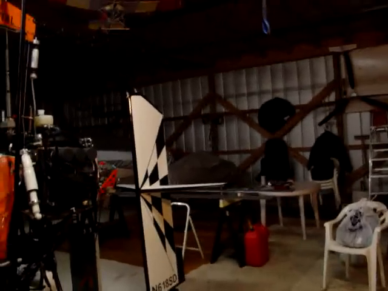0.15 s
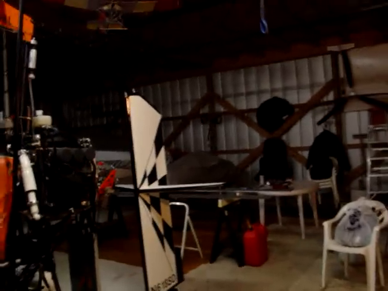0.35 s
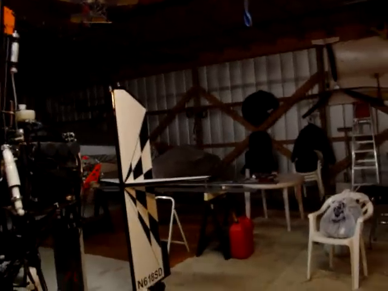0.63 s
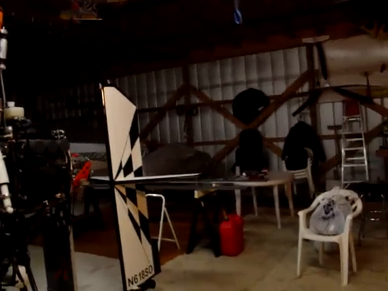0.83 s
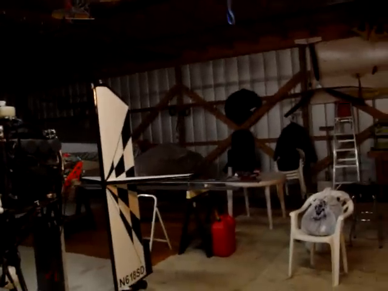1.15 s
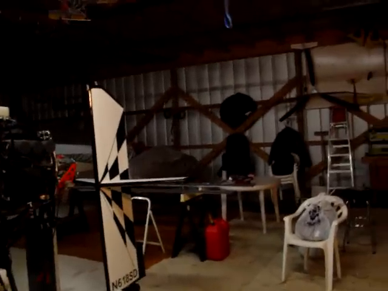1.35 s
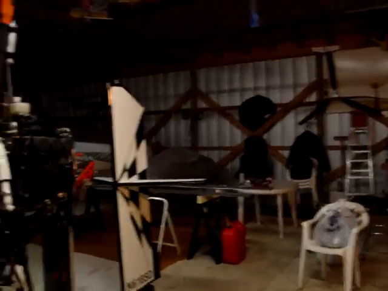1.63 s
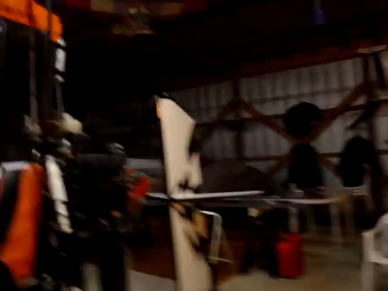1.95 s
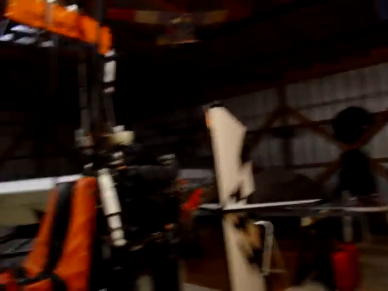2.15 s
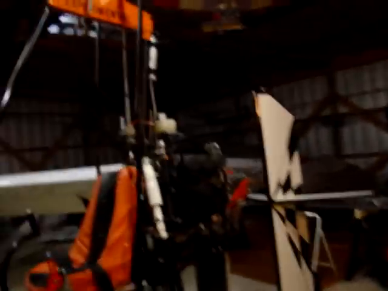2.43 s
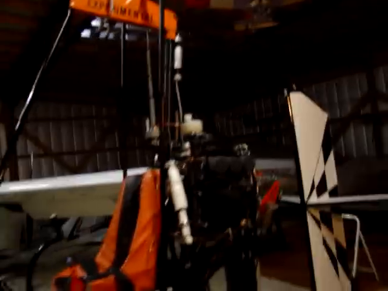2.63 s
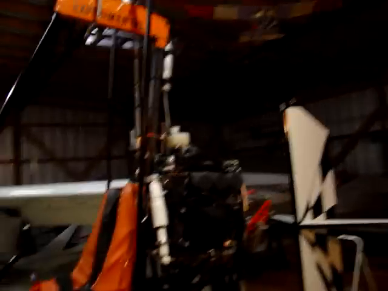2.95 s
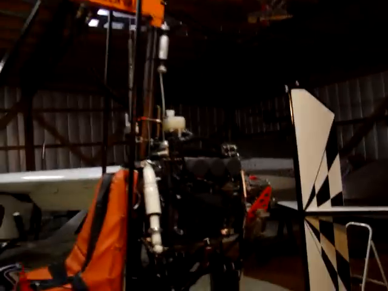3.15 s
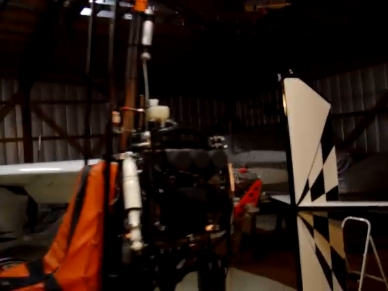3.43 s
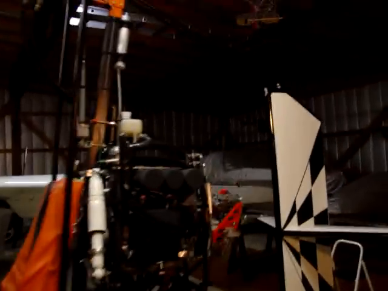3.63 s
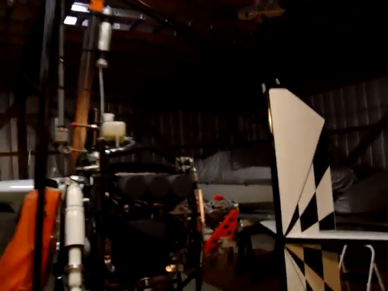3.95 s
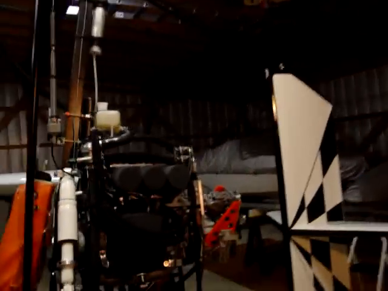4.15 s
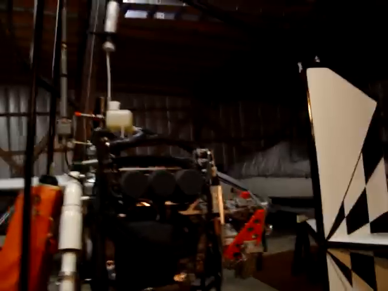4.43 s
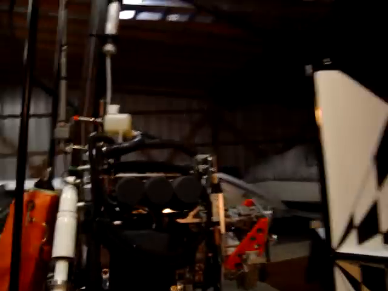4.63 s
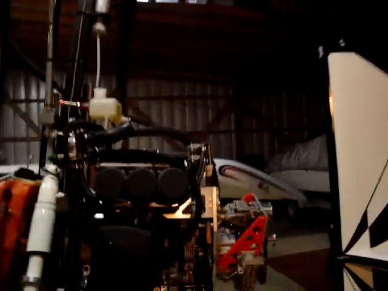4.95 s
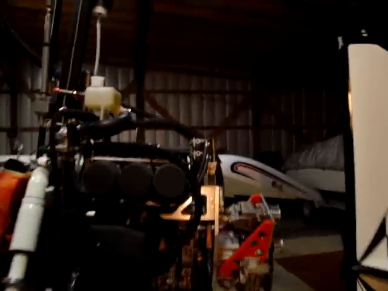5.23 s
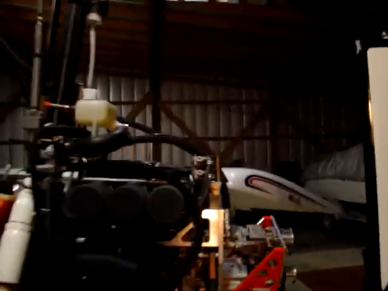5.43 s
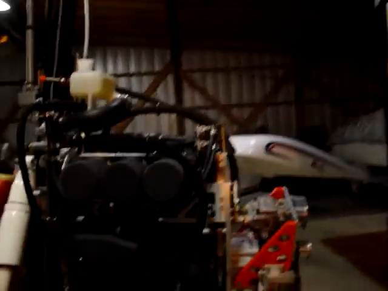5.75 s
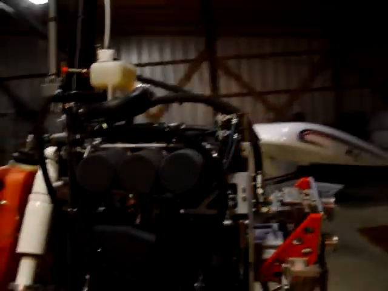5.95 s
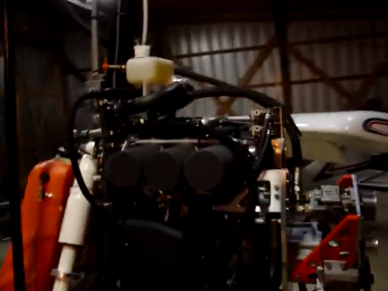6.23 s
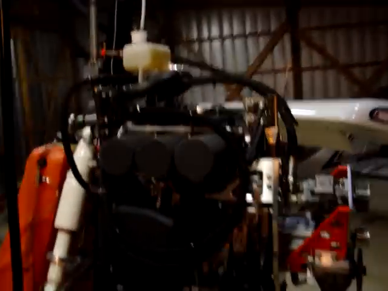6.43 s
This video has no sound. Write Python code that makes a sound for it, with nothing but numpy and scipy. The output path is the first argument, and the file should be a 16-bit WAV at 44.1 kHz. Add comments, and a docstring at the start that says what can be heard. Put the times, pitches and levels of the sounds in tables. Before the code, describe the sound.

A small petrol engine idles unevenly with a rough, throaty exhaust in a metal hangar, its clatter growing clearer as the microphone approaches.

```python
"""A small three-cylinder petrol engine is heard idling unevenly, growing closer in a sheet-metal hangar.
Unequal firings, timed by an uneven crank speed, excite a decaying silencer ring and filtered gas noise.
Noise bursts through metal resonances give the clatter; coloured noise gives hiss, whirr and faint rumble.
A diffuse noise tail and moving resonances draw the booms into a drone that shifts as the microphone walks up."""
import sys
import numpy as np
from scipy import signal
from scipy.fft import rfft, irfft
from scipy.io import wavfile
from scipy.ndimage import uniform_filter1d, minimum_filter1d

SR = 44100
rng = np.random.default_rng(int(sys.argv[2]) if len(sys.argv) > 2 else 0)


def materialize(psi):
    """Save the field psi as 16-bit PCM at rate SR to the path in sys.argv[1].

    A 1-D psi becomes a single channel; in a 2-D psi each row is a channel.
    """
    bounded = np.clip(np.atleast_2d(psi).T, -1, 1)
    quanta = np.round(bounded * 32767).astype(np.int16)
    wavfile.write(sys.argv[1], SR, quanta)


N = 290486
TIME = np.arange(N) / SR  # s

# The walk up to the engine: (time [s], nearness [0-1])
WALK = [(0, 0), (2.0, .12), (3.6, .5), (6.0, 1)]

# Filter spectra, relative to the sound being coloured: (frequency [Hz], gain [dB])
THUD_SPECTRUM = [(10, -54.5), (28, -33), (45, -25), (60, 0.5), (74, -11.5), (90, -1), (102, 2.5),
                 (118, 1.5), (160, 8.5), (300, -38), (700, -46.5)]
RASP_SPECTRUM = [(120, -34.5), (230, 4), (330, 2.5), (420, 1.5), (470, -0.5), (560, -4), (640, -9),
                 (740, -8), (860, -15.5), (950, -11), (1200, -17.5), (2000, -23), (5000, -70.5)]
CLATTER_SPECTRUM = [(400, -27.5), (900, -4), (1150, -4.5), (1500, 1), (1800, -3.5), (2200, -2.5),
                    (2550, -3), (3050, -3), (3350, 2), (3750, -5), (4200, -5), (4580, -13), (5400, -4.5),
                    (7000, -14), (10000, -33)]
HISS_SPECTRUM = [(2000, -11), (4000, -10), (5500, -7), (6200, -7), (6700, -4.5), (7600, -1), (8500, 0),
                 (9000, -6.5), (9500, -11), (10000, -14)]
RUMBLE_SPECTRUM = [(5, 3.5), (25, -19.0), (60, -13.0), (150, -7.5), (600, -58.5)]
WHIRR_SPECTRUM = [(1500, -18), (3500, 2.5), (4600, -4), (5400, -3.5), (6500, -1), (8000, -11), (10000, -8.5)]

# Reverberation of the hangar: (frequency [Hz], time to decay by 60 dB [s])
HALL_DECAY = [(80, 0.56), (250, 1), (1000, 0.93), (4000, 0.62), (10000, 0.14)]
# Standing waves, each swelling as the microphone passes through it:
# (time [s], half length [s], frequency [Hz], width [Hz], level beside the boom before random swells [dB])
STANDING_WAVES = [(0.96, 1.25, 218, 16, -8), (0.73, 2.54, 510, 6.7, -16.5), (1.04, 1.1, 350, 19, -14.5),
                  (0.62, 0.65, 230, 15, -11), (2.2, 0.75, 175, 17, -11.5), (3.01, 0.6, 392, 31, -14),
                  (2.94, 0.78, 947, 42, -27.5), (3.7, 4.3, 308, 18, -15.5), (3, 1.8, 127, 8.4, -18.5),
                  (3.4, 6.2, 90, 6.1, -23.5), (4.58, 0.15, 177, 6.7, -6), (5.38, 0.2, 177, 6.6, -4.5),
                  (6.22, 0.18, 177, 7.3, -3), (5.3, 1.4, 163, 12, -11), (5.53, 0.83, 262, 24, -7.5),
                  (5.83, 0.78, 520, 23, -17.5)]
# Strongest standing wave, whose pitch sinks along the walk: (time [s], frequency [Hz], level beside the boom [dB])
DRONE_PATH = [(1.85, 261, -23), (2.42, 257.4, -3.5), (2.68, 255.6, -8.5), (3.0, 262.7, -2.5),
              (3.35, 261.5, -2.5), (3.7, 256.2, 1), (3.95, 242.5, -7), (4.3, 243.5, -2.5), (4.7, 235.6, -8),
              (5.2, 228, -23)]
DRONE_WIDTH_HZ = 14
# Dead bands, where reflections from floor and walls cancel the exhaust:
# (frequency [Hz], width [Hz], depth far [0-1], depth near [0-1])
NOTCHES = [(199.4, 10, 0.46, 0.42), (283.3, 10, 0.5, 0.88), (385, 52, 0.03, 0.37), (479, 22, 0.7, 0.49)]

# Uneven crank speed, at which each cylinder fires once a turn: (time [s], speed [turns/s])
CRANK_SPEED = [(0.0, 29.49), (0.13, 26.85), (0.17, 30.91), (0.3, 26.8), (0.34, 26.82), (0.39, 32.83),
               (0.5, 26.77), (0.54, 29.83), (0.65, 32.9), (0.76, 25.69), (0.88, 31.85), (0.92, 28.04),
               (1.0, 28.86), (1.05, 26.05), (1.15, 31.29), (1.19, 26.6), (1.37, 32.3), (1.46, 26.11),
               (1.55, 32.98), (1.61, 27.5), (1.72, 31.2), (1.86, 26.93), (1.92, 32.21), (1.98, 27.16),
               (2.13, 31.28), (2.32, 30.56), (2.38, 26.52), (2.42, 32.6), (2.52, 28.75), (2.63, 28.51),
               (2.67, 33.77), (2.75, 28.19), (2.85, 29.12), (2.93, 30.25), (2.97, 28.21), (3.05, 31.1),
               (3.16, 26.17), (3.2, 31.07), (3.31, 29.54), (3.35, 31.9), (3.39, 28.98), (3.52, 31.63),
               (3.69, 26.89), (3.73, 32.83), (3.85, 27.33), (3.94, 32.52), (4.07, 26.96), (4.14, 31.99),
               (4.25, 28.89), (4.34, 28.75), (4.38, 34.66), (4.47, 27.16), (4.6, 31.19), (4.66, 27.78),
               (4.79, 30.99), (4.87, 28.56), (4.97, 31.65), (5.11, 26.33), (5.15, 33.24), (5.23, 29.95),
               (5.41, 28.87), (5.45, 30.62), (5.51, 28.98), (5.6, 27.48), (5.66, 33.79), (5.76, 29.5),
               (5.89, 28.41), (5.93, 31.9), (6.02, 29.88), (6.13, 29.35), (6.22, 30.71), (6.3, 27.68),
               (6.43, 31.79), (6.5, 27.48), (6.54, 30.24), (6.59, 31.93)]
START_TURN = .156  # crank position at time zero, in turns
# Changes in strength of the first cylinder, mostly weak burns: (time [s], level [dB])
STUMBLES = [(1.239, -10), (2.04, -7), (2.558, -11), (3.22, -4.5), (3.386, -22.5), (4.161, -4.5),
            (4.314, -9.5), (4.729, -7.5), (4.948, -10), (5.27, 2), (5.65, -10), (5.769, -8), (6.48, -9)]
STUMBLE_S = 0.019  # Gaussian half length
# Weaker cylinders beside the first: (level far [dB], level halfway [dB], level near [dB])
SECOND_DB = (-10.5, -8.5, -4.5)
THIRD_DB = (-13.5, -17, -12)
# Lag of the second cylinder behind the first: (far [turns], halfway [turns], near [turns])
SECOND_LAG = (.39, .357, .36)
THIRD_LAG = .685  # turns
PIPE_HZ, RING_S = 218, .00152  # the silencer's ring and its decay constant

# Resonances of block and brackets: (frequency [Hz], width [Hz], drive gain far [dB], drive gain near [dB]);
# each gain also wanders at random
METAL_MODES = [(1958, 45, 3.5, 2), (2800, 120, -1, 3), (3574, 45, 2.5, -4), (3860, 50, 7, 6.5),
               (4386, 64, 7, 7.5), (4800, 340, -4, 8)]
# A bracket briefly rattles harder: (time [s], half length [s], frequency [Hz], level [dB])
RATTLES = [(1.39, 0.047, 3615, -35.5), (6.42, 0.052, 2830, -38.5)]
RATTLE_WIDTH_HZ = 60
# Sharp metallic ticks: (time [s], level before a common trim and filter [dB])
TICKS = [(4.498, -23), (4.773, -16), (5.4755, -23), (5.914, -20), (5.9777, -19), (6.178, -14.5)]
# Bands of the hiss that flicker independently: (frequency [Hz], ...)
FLICKER_BANDS = (5600, 7200, 8400)
# Slow wavering of the hiss: (time [s], level [dB])
HISS_DRIFT = [(0.3, 2.4), (1.2, -0.9), (2.3, 1.3), (3.35, -1.6), (4.1, -0.3), (5.1, -0.5)]
# Share of the hiss that travels straight from the engine: (far [0-1], near [0-1])
DIRECT_SHARE = (0.49, 1)

# Loudness contours before each sound's trim: (level far [dB], level halfway [dB], level near [dB])
BOOM_DB = (-15, -13.5, -13.5)
RASP_DB = (-26.5, -28.5, -30.5)
CLATTER_DB = (-34.5, -34.5, -32.5)
HISS_DB = (-37, -35.5, -36.5)
BARK_DB = (-47, -39, -35.5)
WHIRR_DB = (-39, -41.5, -46.5)

EDGE_HZ = 10050  # upper edge of the band


def gain_of(db):
    """Logarithmic level: 20 dB is a factor of ten in amplitude."""
    return 10 ** (np.asarray(db) / 20)


def evened(x):
    """Power normalization: scales to an rms of 1."""
    return x / np.sqrt(np.mean(x ** 2) + 1e-20)


def steadied(x):
    """Short-term power normalization: divides by a moving rms, smoothed over a fraction of a second."""
    power = uniform_filter1d(uniform_filter1d(x ** 2, size=12000), size=6000)
    return x / np.sqrt(power + 1e-20)


def along(values, t=TIME):
    """Distance dependence: interpolates from the far value to the near one along the walk."""
    nearness = np.interp(t, *np.transpose(WALK))
    return np.interp(nearness, np.linspace(0, 1, len(values)), values)


def read(points, hz):
    """Logarithmic pitch scale: interpolates a spectrum table over log frequency."""
    f, value = np.transpose(points)
    return np.interp(np.log(hz + 1), np.log(f + 1), value)


def colour(x, points):
    """Minimum phase: the Hilbert transform of the log gain fixes the phase of a causal filter."""
    hz = abs(np.fft.fftfreq(8192, 1 / SR))
    log_gain = np.log(gain_of(read(points, hz)))
    taps = np.fft.ifft(np.exp(np.conj(signal.hilbert(log_gain)))).real
    return signal.oaconvolve(x, taps[:len(taps) // 2])[:N]


def resonate(x, hz, width):
    """Simple resonance: a two-pole peak of unit gain at its centre."""
    return signal.lfilter(*signal.iirpeak(hz, hz / width, SR), x)


def glide(x, hz, width):
    """Heterodyning: shifts a moving pitch to zero, low-passes it and shifts it back."""
    turn = np.exp(2j * np.pi * np.cumsum(hz) / SR)
    r = np.exp(-np.pi * width / SR)
    return 2 * (turn * signal.lfilter([1 - r], [1, -r], x / turn)).real


def clicks(times, sizes):
    """Impulse excitation: one single-sample pulse at each time."""
    samples = np.round(np.maximum(times, 0) * SR).astype(int)
    return np.bincount(samples, sizes, N)[:N]


def puffs(times, sizes, decay):
    """Turbulent bursts: noise whose power rises quickly and dies away exponentially."""
    u = np.arange(SR // 10) / SR / decay
    power = signal.oaconvolve(clicks(times, sizes ** 2), u * np.exp(-u))[:N]
    return np.sqrt(abs(power)) * rng.standard_normal(N)


def scatter(times, spread_db):
    """Random excitation: a clipped normal spread of levels, one for each event."""
    return gain_of(spread_db * np.clip(rng.standard_normal(len(times)), -2, 2))


def wander(size):
    """Slow fluctuation: random steps of so many samples, smoothed and scaled to an rms of 1."""
    steps = np.repeat(rng.standard_normal(N // size + 1), size)
    return evened(uniform_filter1d(steps, size))[:N]


def rumble(level_db=-52):
    """Ambient noise: low-coloured random pressure stands for the air of the hall."""
    return gain_of(level_db) * evened(colour(rng.standard_normal(N), RUMBLE_SPECTRUM))


def hangar(x, count=5):
    """Diffuse reverberation: sparse noise tails decay by frequency and cross-fade from place to place."""
    shape = (count, SR)
    taps = rng.standard_normal(shape) * (rng.random(shape) < .1) * (TIME[:SR] > .014)
    hz, t, z = signal.stft(taps, SR, nperseg=256)
    decay = gain_of(-60 * t / read(HALL_DECAY, hz)[:, None])
    tails = signal.istft(z * decay, SR, nperseg=256)[1]
    tails /= np.linalg.norm(tails, axis=1, keepdims=True)
    wet = irfft(rfft(x) * rfft(tails, N), N)  # circular: the hall is already ringing at the start
    place = np.linspace(0, count - 1, N) - np.arange(count)[:, None]
    fade = np.cos(np.pi / 2 * np.clip(place, -1, 1))
    return (wet * fade).sum(0)


def drone(x):
    """Standing wave: a narrow resonance of moving pitch draws a hum from the booms."""
    s, hz, db = np.transpose(DRONE_PATH)
    hz = np.interp(TIME, s, hz)
    wave = glide(glide(x, hz, DRONE_WIDTH_HZ), hz, 6 * DRONE_WIDTH_HZ)
    return gain_of(np.interp(TIME, s, db)) * steadied(wave)


def cancelled(x):
    """Destructive interference: subtracting a resonance leaves a dead band."""
    for hz, width, *depth in NOTCHES:
        x = x - np.clip(along(depth), 0, 1) * resonate(x, hz, width)
    return x


def whirr():
    """Broadband flow and friction noise: the smooth hiss of belts and intake air."""
    return gain_of(along(WHIRR_DB)) * evened(colour(rng.standard_normal(N), WHIRR_SPECTRUM))


def ticks(level_db=7):
    """Impact noise: loose metal gives single bright, short bursts with a faint reverberant tail."""
    s, db = np.transpose(TICKS)
    sound = colour(puffs(s, gain_of(db + level_db), decay=0.00047), HISS_SPECTRUM)
    return sound + gain_of(-25) * hangar(sound)


def hiss(times, trail_db=2, grit_db=-3, flicker_db=0.04, patch_db=2, level_db=3.5):
    """Jet noise: a spit and trail once a turn, with loose grit; the direct share grows with nearness."""
    spit = evened(puffs(times + 0.0012, scatter(times, spread_db=0.5), decay=0.0013))
    trail = evened(puffs(times + 0.0052, scatter(times, spread_db=3.5), decay=0.0055))
    grains = rng.uniform(0, TIME[-1], size=900)
    grit = evened(puffs(grains, scatter(grains, spread_db=4), decay=.0005))
    dry = evened(spit + gain_of(trail_db) * trail + gain_of(grit_db) * grit)
    share = np.clip(along(DIRECT_SHARE), 0, 1)
    sound = colour(np.sqrt(share) * dry + np.sqrt(1 - share) * hangar(dry), HISS_SPECTRUM)
    for hz in FLICKER_BANDS:
        patch = gain_of(patch_db * wander(size=600)) - 1
        sound = sound + patch * resonate(sound, hz, 1000)
    flickering = sound * gain_of(flicker_db * wander(size=800))
    drift_db = np.interp(TIME, *np.transpose(HISS_DRIFT))
    return gain_of(along(HISS_DB) + drift_db + level_db) * steadied(flickering)


def clatter(times, strength, whirr_db=-11, wander_db=2.0, hall_db=-3, level_db=-0.98):
    """Modal excitation: two knocks a firing and the drive's whirr ring the block and brackets."""
    knocks = 0
    for lag in (.0015, .0058):  # s
        size = strength ** 0.65 * scatter(times, spread_db=4.0)
        knocks = knocks + puffs(times + lag, size, decay=0.00054)
    drive = evened(knocks) + gain_of(whirr_db) * rng.standard_normal(N)
    drive = gain_of(-3.0) * drive + gain_of(hall_db) * hangar(drive)
    rung = drive
    for hz, width, *db in METAL_MODES:
        rung = rung + gain_of(along(db) + wander_db * wander(size=4000)) * resonate(drive, hz, width)
    rattles = 0
    for s, half, hz, db in RATTLES:
        swell = gain_of(db) * np.exp(-((TIME - s) / half) ** 2)
        rattles = rattles + swell * evened(resonate(drive, hz, RATTLE_WIDTH_HZ))
    return gain_of(along(CLATTER_DB) + level_db) * steadied(colour(rung, CLATTER_SPECTRUM)) + rattles


def firings(spread_db=.6, weak_spread_db=2, jitter_s=0.0001, count=198):
    """Crank kinematics: integrated speed times the firings; one row a cylinder, the weak ones less even."""
    t = np.arange(N + SR) / SR
    turns = START_TURN + np.cumsum(np.interp(t, *np.transpose(CRANK_SPEED))) / SR
    turn = np.arange(count)
    starts = np.interp(turn, turns, t)
    positions = [turn, turn + along(SECOND_LAG, starts), turn + THIRD_LAG]
    times = np.interp(positions, turns, t)
    times = times + jitter_s * rng.standard_normal(times.shape)
    stumble_db = sum(db * np.exp(-((starts - s) / STUMBLE_S) ** 2) for s, db in STUMBLES)
    first = scatter(starts, spread_db) * gain_of(stumble_db)
    weak = [gain_of(along(db, starts)) * scatter(starts, weak_spread_db) for db in (SECOND_DB, THIRD_DB)]
    return times, np.array([first, *weak])


def bark(times, body_hz=720, width_hz=260):
    """Cavity resonance: the third cylinder's gas pulses give a short, hollow bark, louder close to."""
    size = scatter(times, spread_db=2)
    gas = evened(clicks(times + 0.00062, size)) + evened(puffs(times, size, decay=0.0052))
    body = resonate(resonate(gas, body_hz, width_hz), body_hz, 2 * width_hz)
    return gain_of(along(BARK_DB)) * steadied(body)


def rasp(times, strength, rough=0.73, hall_db=1, level_db=3):
    """Wave steepening: the sharp front of each gas pulse and its turbulence feed the middle band."""
    front = clicks(times + 0.0026, strength * scatter(times, spread_db=1.5))
    gas = evened(front) + rough * evened(puffs(times, strength, decay=0.0019))
    sound = colour(gas + gain_of(hall_db) * hangar(gas), RASP_SPECTRUM)
    return gain_of(along(RASP_DB) + level_db) * steadied(sound)


def exhaust(times, strength, hall_db=-15, thud_db=-13.5, turbulence=0.39, swell_db=1.5, level_db=-0.25):
    """Impulse response: firings ring the silencer over a deep thud, and room modes prolong them."""
    pulses = clicks(times, strength)
    wet = hangar(pulses)
    t = TIME[:SR // 20]
    silencer = -t ** 3 * np.exp(-t / RING_S) * np.sin(2 * np.pi * PIPE_HZ * t)
    boom = evened(signal.oaconvolve(pulses + gain_of(hall_db) * wet, silencer)[:N])
    gas = evened(puffs(times, strength, decay=0.0013))  # turbulence makes no two thuds alike
    blast = evened(pulses + wet) + turbulence * gas
    sound = boom + gain_of(thud_db) * evened(colour(blast, THUD_SPECTRUM)) + drone(boom)
    for s, half, hz, width, db in STANDING_WAVES:
        wave = resonate(resonate(boom + blast, hz, width), hz, 4 * width)
        swell = gain_of(db + swell_db * wander(size=6000))
        sound = sound + swell * np.exp(-((TIME - s) / half) ** 2) * steadied(wave)
    high_pass = signal.butter(2, 34, "high", fs=SR, output="sos")
    return gain_of(along(BOOM_DB) + level_db) * steadied(signal.sosfilt(high_pass, sound))


def scene():
    """Superposition: background and engine sounds add, with one set of firings driving the engine."""
    times, strength = firings()
    every = times.ravel(), strength.ravel()
    background = rumble() + ticks() + whirr()
    mechanism = hiss(times[0]) + clatter(*every)
    pipe = cancelled(rasp(*every) + exhaust(*every))
    return (background + mechanism + bark(times[2]) + pipe)[None]


def record(dry):
    """Peak limiting and band limiting: a quick, soft gain reduction precedes a low-pass."""
    peak = -minimum_filter1d(-abs(dry), size=260)
    reduction = uniform_filter1d(np.maximum(peak / .56, 1) ** .65, size=130)
    low_pass = signal.firwin(511, EDGE_HZ, window=("kaiser", 9), fs=SR)
    return signal.oaconvolve(dry / reduction, low_pass[None], "same")


dry = scene()
out = record(dry)
materialize(out)
```